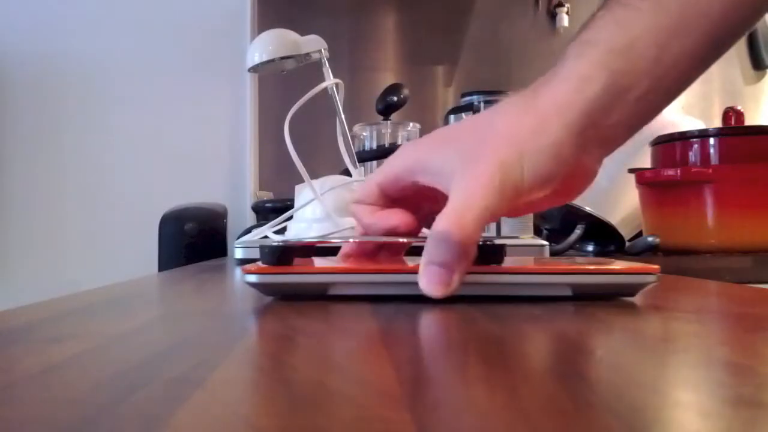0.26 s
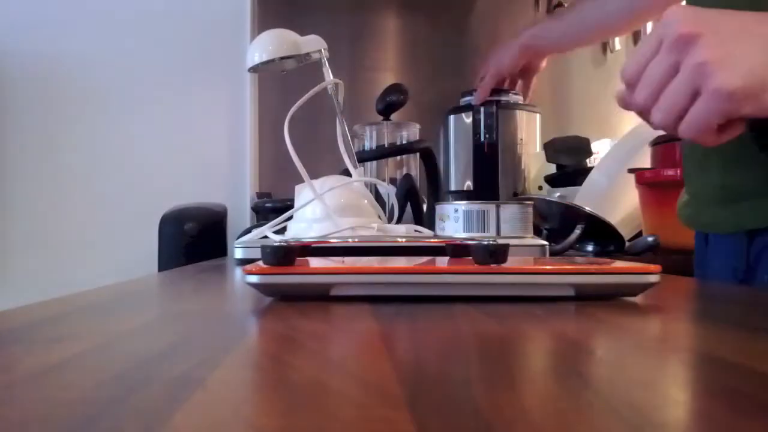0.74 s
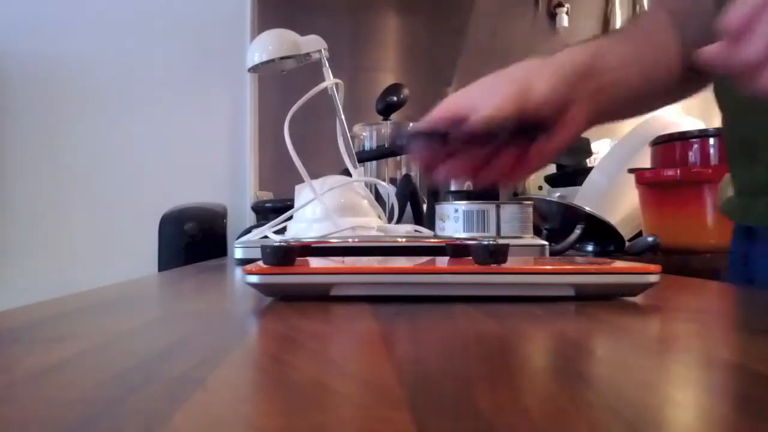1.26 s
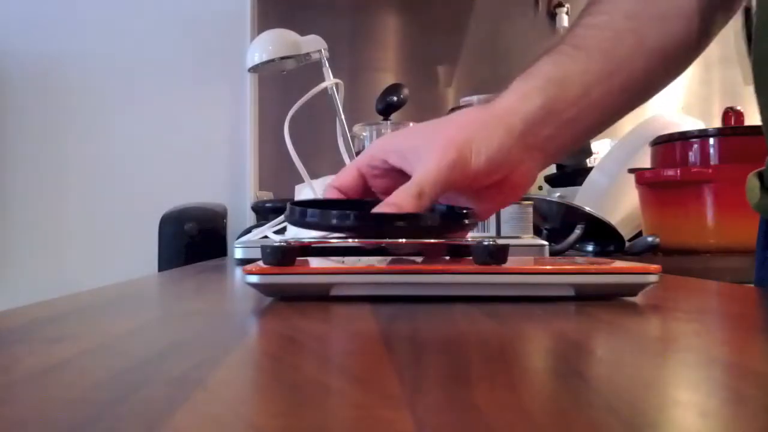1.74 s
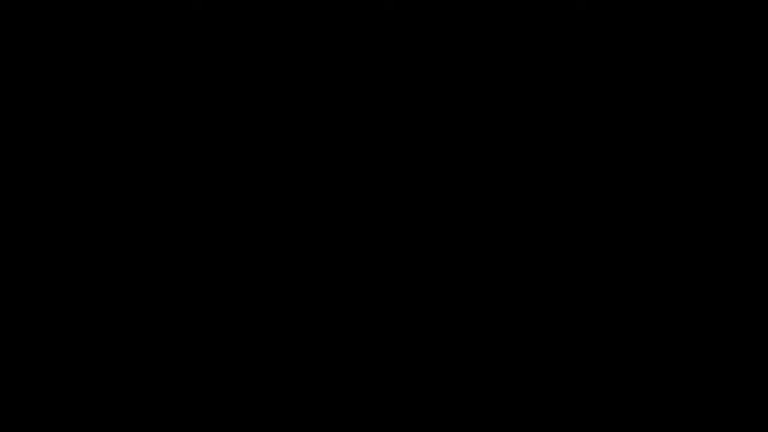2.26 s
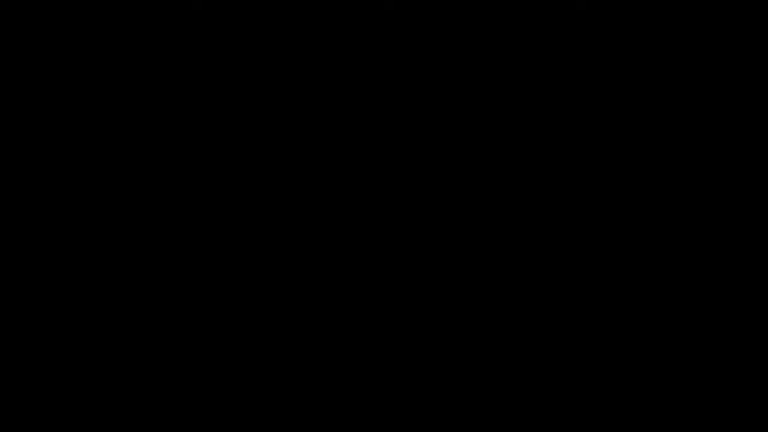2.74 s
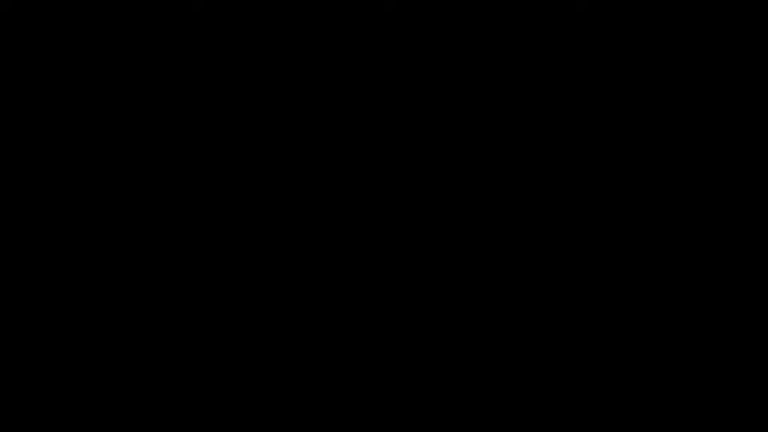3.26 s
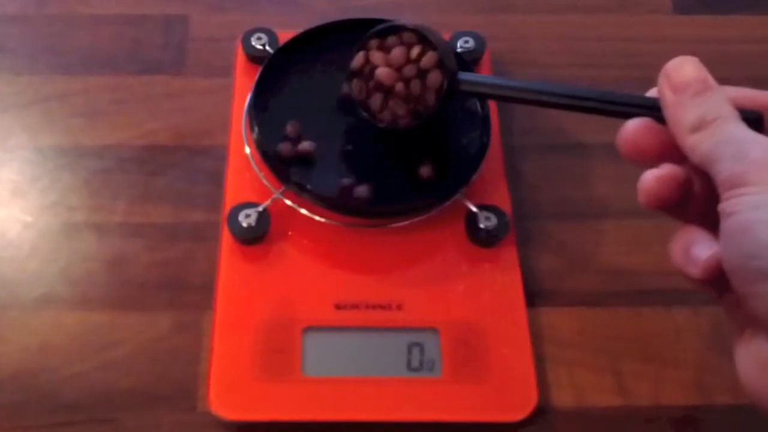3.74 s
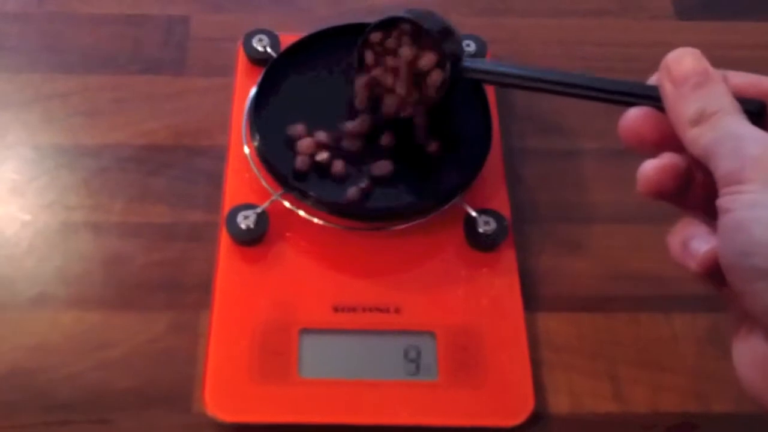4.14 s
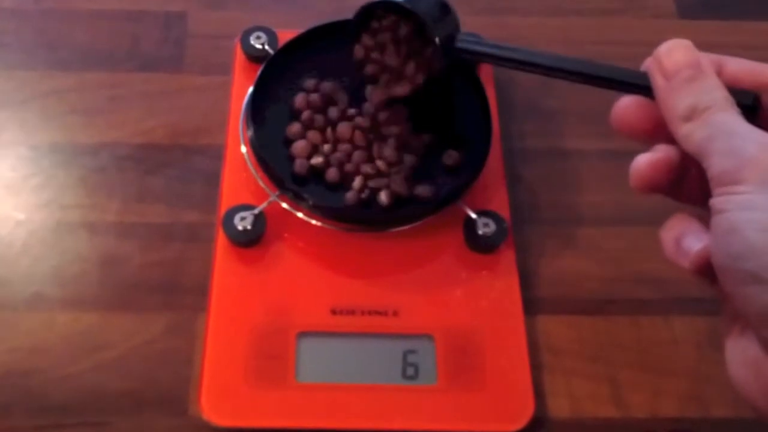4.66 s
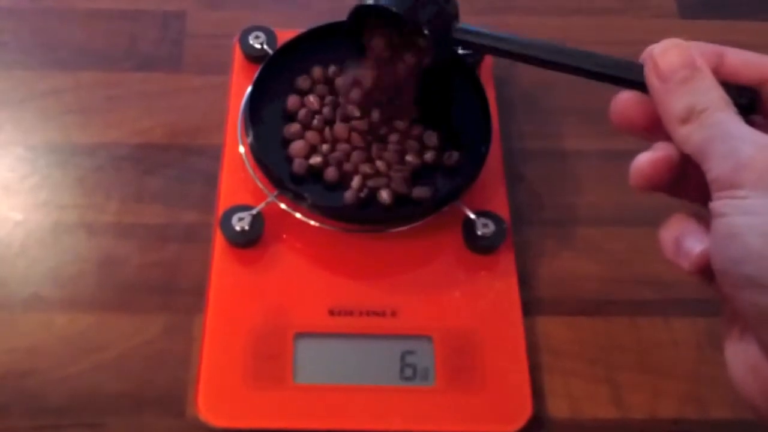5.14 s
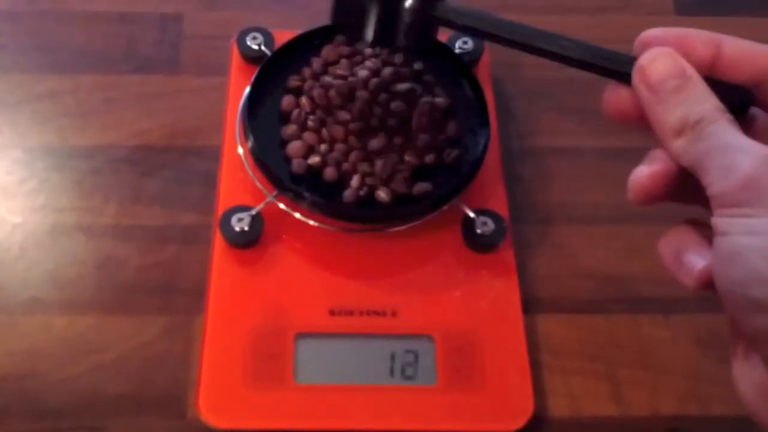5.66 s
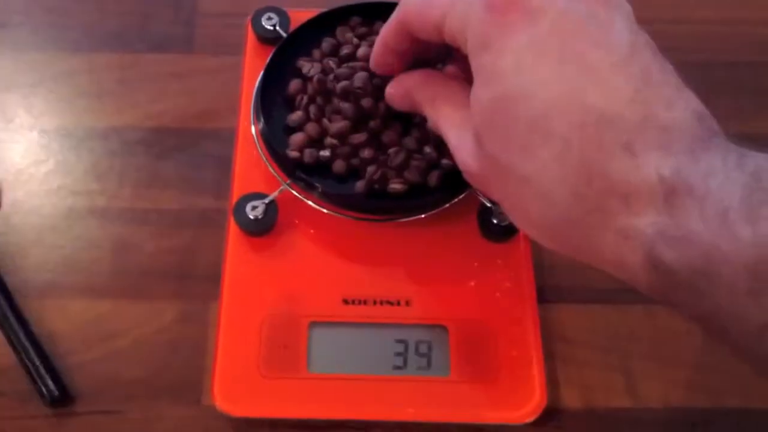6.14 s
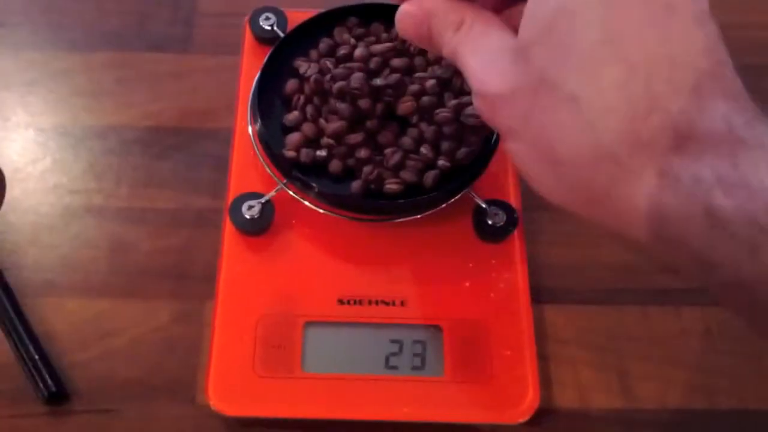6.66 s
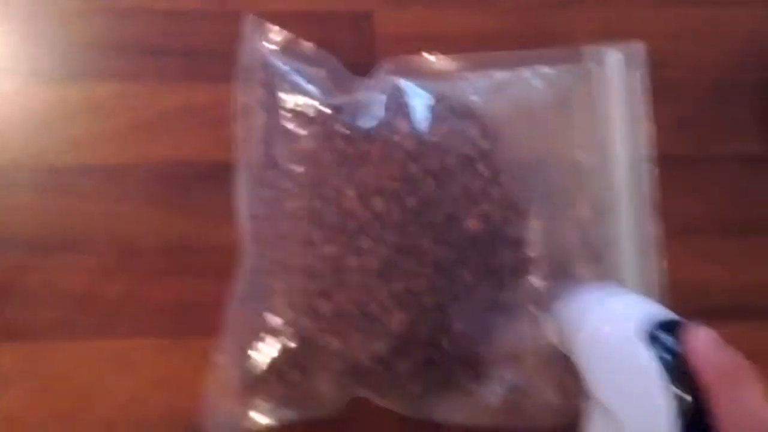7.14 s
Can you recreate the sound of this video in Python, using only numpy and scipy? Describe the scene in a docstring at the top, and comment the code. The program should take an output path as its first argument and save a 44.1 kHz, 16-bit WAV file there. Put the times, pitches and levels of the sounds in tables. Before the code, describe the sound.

In a small echoing kitchen with faint room noise and hum, a scale bumps softly onto the worktop. A grinder's plastic lid squeaks and comes off with a sharp clack, then taps down on the scale. A bag of beans rustles close to the microphone, beans rattle brightly into the lid, and finally a soft rush and a pump click follow.

```python
"""Weighing coffee in a small kitchen, over room noise and a faint hum. First a scale bumps down on the worktop.
A grinder's plastic lid squeaks and clacks as it is pulled off, then taps down on the scale. Next a bag of beans
rustles, with rubbing noise and snapping creases. Beans tip from a scoop into the lid, each ringing its own shell
and the plastic, and a finger nudges them. A soft rush comes in, and a hand pump clicks onto a plastic bag.
Solid things are sums of fading tones, rubbing is shaped crackle, and the kitchen echoes the handling."""
import sys
import numpy as np
from scipy import signal
from scipy.fft import rfft, irfft, next_fast_len
from scipy.io import wavfile
from scipy.ndimage import uniform_filter1d

SR = 44100
rng = np.random.default_rng(int(sys.argv[2]) if len(sys.argv) > 2 else 0)


def store_pcm(level_fs):
    """Save levels as 16-bit WAV."""
    pcm = np.round(np.clip(level_fs, -1, 1) * 32767).astype(np.int16)
    wavfile.write(sys.argv[1], SR, np.atleast_2d(pcm).T)


N = 326340
T = np.arange(N) / SR  # time of every sample, in seconds

# Levels in the tables are starting points: the functions trim and vary them.
# EVENTS
# Moments when the level dips briefly (t/s)
DIPS = [.688, 1.254, 2.169, 3.526, 5.887, 7.046]
# Hands sliding over plastic (t/s, hold/s, level/dB)
SLIDES = [(0, 0.011, -53.5), (.1, 0.44, -68.5), (0.713, 0.18, -53.5), (1.372, 0.11, -54.5),
          (1.69, 0.41, -61), (7.104, 0.033, -54.5), (7.255, .15, -60)]
# Scale, grinder and pump bumping on the worktop, and at 5.5 s the scoop knocking the scale (t/s, level/dB)
BUMPS = [(.003, -43), (0.023, -47), (0.09, -47.5), (0.521, -65), (0.815, -84), (0.875, -49.5), (5.5, -50.5),
         (5.937, -47), (6.099, -61), (7.099, -46), (7.255, -53)]
# Air pushed at the microphone by an arm (t/s, length/s, level/dB)
PUFFS = [(.01, 0.034, -42), (.82, 0.046, -40.5), (1.522, 0.059, -37), (3.26, 0.041, -33)]
# Fingers brushing the lid (t/s, length/s, level/dB)
BRUSHES = [(.81, 0.017, -58.5), (.88, 0.009, -52.5), (1.035, 0.021, -57.5), (1.15, 0.042, -52.5),
           (1.53, 0.055, -50.5), (1.7, 0.015, -53.5), (1.94, 0.011, -61.5)]
# The lid knocking on the grinder and rattling in the hand (t/s, level/dB)
LID_CLACKS = [(1.17, -49), (1.37, -24), (1.383, -34), (1.432, -48), (1.488, -48), (1.583, -50)]
# The lid touching down on the scale (t/s, level/dB)
LID_TAPS = [(1.712, -37.5), (1.734, -38), (1.744, -35.5), (1.76, -40), (1.772, -43), (1.891, -42),
            (1.904, -54), (1.954, -50), (2.059, -51)]
# Pushes of the hand in the bag (t/s, rise/s, hold/s, rubbing level/dB, sharpness/dB)
PUSHES = [(2.181, 0.0069, 0.0028, -42.5, -2), (2.263, 0.0043, 0.021, -34, -2),
          (2.403, .007, .031, -17.5, 8), (2.606, 0.071, 0.03, -16, 4.5), (2.812, 0.12, 0.07, -25, -1),
          (2.986, 0.2, 0.044, -24, 1.5), (3.126, 0.16, 0.055, -23.5, 2.5), (3.237, 0.18, 0.06, -30, 4)]
# Beans that keep shifting between pushes, one row (t/s, length/s, rubbing level/dB, sharpness/dB)
SHIFTING = (2.35, 1.4, -38.5, 4)
# Creases of the bag snapping over (t/s, crack level/dB, wall level/dB)
CREASES = [(2.2558, -30, -31.5), (2.2848, -24.5, -21.5), (2.3513, -24, -32), (2.3605, -25.5, -29.5),
           (2.4933, -32.5, -21), (2.514, -23.5, -17.5), (3.1394, -22, -24), (3.1824, -25, -24),
           (3.257, -31, -23.5), (3.2828, -30, -23.5), (3.3367, -38, -17.5), (3.407, -32, -54),
           (3.4377, -43, -21), (3.444, -27, -31.5), (3.4802, -33.5, -44), (3.4907, -22.5, -43)]
# Single beans, loud and quiet, hitting scoop and lid (t/s, shell click level/dB, plastic ring level/dB)
SINGLE_BEANS = [(3.54, -34, -33.5), (3.552, -28, -43), (3.575, -16.5, -24.5), (3.588, -10.5, -17.5),
                (3.632, -9.5, -19.5), (3.7, -16, -23.5), (3.812, -11, -13.5), (3.874, -12.5, -22),
                (3.919, -8.5, -11.5), (3.971, -14.5, -11), (3.989, -10.5, -14.5), (4.012, -14.5, -13),
                (4.062, -13, -14.5), (4.089, -17, -21), (4.099, -17, -16.5), (4.112, -16, -22),
                (4.156, -7, -17), (4.174, -11.5, -20.5), (4.192, -10, -23), (4.2, -8.5, -18),
                (4.219, -8, -18), (4.241, -4.5, -13.5), (4.28, -14, -26), (4.299, -8.5, -18.5),
                (4.337, -13.5, -16), (4.398, -17, -16.5), (4.405, -14, -26.5), (4.448, -13.5, -27),
                (4.554, -5, -16), (4.594, -11, -19), (4.667, -13.5, -21), (4.7, -17, -19.5),
                (4.798, -22, -24), (4.828, -13, -21), (4.865, -25, -29), (4.885, -20, -21),
                (4.896, -19, -18), (4.964, -18.5, -18), (5.0, -19.5, -17), (5.063, -14.5, -15),
                (5.079, -12.5, -15.5), (5.189, -25, -21.5), (5.426, -16, -30), (5.5, -15, -28),
                (5.564, -25, -33.5), (5.628, -47, -31.5), (5.773, -42.5, -39), (5.954, -29, -28.5),
                (5.962, -36.5, -37), (6.1, -65, -51)]
# Beans sliding off the scoop in surges over a thin trickle; the last row is a finger's nudge
# (t/s, hold/s, shell click level/dB, plastic ring level/dB)
SURGES = [(3.535, 0.21, -38, -35), (3.6, 0.035, -26.5, -28.5), (3.864, 0.91, -45, -37.5),
          (3.977, 0.11, -25.5, -30.5), (4.098, 0.19, -25.5, -24), (4.465, 0.091, -25.5, -24),
          (4.553, 0.043, -19, -21), (4.656, 0.14, -31, -26.5), (4.904, 0.27, -30.5, -30.5),
          (5.075, .44, -29, -25.5), (5.946, 0.004, -50.5, -34.5)]
# Dull thumps of hands leaning on the worktop (t/s, length/s, level/dB)
THUMPS = [(4.91, 0.038, -52.5), (7.147, 0.0065, -44.5)]
# A soft, even rush coming in late (t/s, level/dB)
RUSH = [(5.8, -98), (5.9, -62), (6.55, -60.5), (7.4, -55.5)]
# The pump's nozzle clicking on the bag's valve (t/s, level/dB)
PUMP_CLICKS = [(7.098, -25.5), (7.142, -48), (7.255, -48), (7.369, -52)]

# Tones that an object rings with when struck (f/Hz, time to fade by 60 dB/s, relative level/dB):
# the worktop
WORKTOP = [(155, 0.105, -5), (262, 0.069, -1), (560, 0.07, 3.5), (717, 0.12, 0), (1143, 0.048, 6.5),
           (1640, 0.029, -3), (4200, .02, -31)]
# the grinder, f/Hz, fade/s, level/dB as above
GRINDER = [(718, 0.09, -10), (950, 0.049, -4), (1056, 0.098, 0.5), (1180, 0.19, -9), (1270, 0.058, -8),
           (2110, 0.11, -12), (2350, 0.035, -5), (3740, 0.1, -11), (4409, .09, -13), (5830, 0.059, -6),
           (7450, .09, -14)]
# the plastic lid, f/Hz, fade/s, level/dB as above
LID = [(1330, 0.11, -10), (1700, 0.028, -11.5), (1770, 0.032, -2.5), (1850, 0.007, -6.5),
       (2232, 0.023, -10.5), (2890, 0.0077, -8), (3754, 0.01, -1), (4160, 0.023, -9), (4770, 0.0052, -1.5),
       (5766, 0.009, -0.5), (6400, 0.011, -8.5)]
# the bag's crackling creases, f/Hz, fade/s, level/dB as above
BAG_CRACK = [(2930, 0.0023, -2.5), (4060, 0.0057, 2), (5210, 0.0089, 1), (6270, 0.0039, 1.5),
             (8000, 0.0046, -8.5)]
# the bag's walls, f/Hz, fade/s, level/dB as above
BAG_WALL = [(125, 0.044, -5.5), (316, 0.046, -2.5), (485.5, 0.036, -3), (738, 0.023, 2),
            (1054, 0.044, -5.5), (1440, 0.014, -1)]
# a bean's shell, f/Hz, fade/s, level/dB as above
SHELL = [(7730, 0.0069, -10), (9184, 0.0044, 0.5), (11180, 0.0079, 1.5), (12100, 0.0057, -12.5),
         (12650, 0.0041, 7.5), (13600, 0.0098, -21), (15140, 0.0018, -3)]
# the heap of beans, f/Hz, fade/s, level/dB as above
HEAP = [(2500, 0.0015, -0.35), (3030, 0.0049, -0.9), (4410, 0.0064, 1)]
# the scale, f/Hz, fade/s, level/dB as above
SCALE = [(111, 0.014, -5.5), (237.5, 0.015, -3.5), (400, 0.012, 2.5), (615, 0.01, 2.5), (940, 0.03, 8.5)]
# the pump, f/Hz, fade/s, level/dB as above
PUMP = [(410, 0.016, -16), (916, 0.0026, -24.5), (1480, 0.014, -7), (2680, 0.0047, -2.5),
        (3470, 0.0033, 1.5), (4330, 0.0084, 0.5), (5100, 0.0035, -2), (6920, 0.0024, 1),
        (10150, 0.0015, -4.5), (14500, 0.0055, -6.5)]

# Balance of low and high in each noise (f/Hz, relative level/dB):
# the room noise
AIR_COLOUR = [(15, -32), (25, 8), (102, -4.5), (309, -15), (363, -19.5), (394, -4.5), (463, -24.5),
              (545, -19), (1330, -22.5), (1840, -26), (2410, -36.5), (16000, -24.5)]
# hands sliding, f/Hz, level/dB as above
SLIDE_COLOUR = [(40, -11.5), (150, 8), (650, 5), (1200, -3), (2000, -6.5), (4200, -12), (6500, -16.5),
                (16000, -12)]
# bag walls flapping, f/Hz, level/dB as above
FLAP_COLOUR = [(25, -11.5), (60, -3.5), (130, -2), (250, -3), (550, 2.5), (1150, 0.5), (1800, -3),
               (3000, -10), (8000, -49.5)]
# beans and bag rubbing, f/Hz, level/dB as above
RUB_COLOUR = [(300, -9), (1400, -6.5), (2400, -6), (3500, 2), (5700, 4), (7500, -2), (10000, -15),
              (16000, -29.5)]
# the bag's hiss, f/Hz, level/dB as above
HISS_COLOUR = [(3000, -28), (6500, -2.5), (8500, -1.5), (11500, 2.5), (13500, 2), (16000, -10)]
# beans sliding on each other, f/Hz, level/dB as above
JOSTLE_COLOUR = [(1500, -27.5), (1800, 6), (2050, -3), (3400, -3.5), (3800, 0), (5900, -6.5), (7200, -9),
                 (12600, -7.5), (16000, -21.5)]
# the late rush, f/Hz, level/dB as above
RUSH_COLOUR = [(60, -4), (170, 1), (300, -3.5), (800, -11.5), (1750, -4), (3500, -14), (6000, -25.5),
               (16000, -28)]
# Steady tones of the kitchen hum (f/Hz, level/dB)
HUM = [(100, -68), (398.4, -72)]
# The kitchen's echo in bands (centre f/Hz, time to fade by 60 dB/s, level/dB)
ROOM = [(150, 0.3, -8.5), (1090, 0.97, -9), (1810, 0.32, -6.5), (4000, 0.4, -12.5), (8000, 0.29, -14.5),
        (13000, 0.1, -11)]

AIR_DB = -57  # room noise before its trim
SLIDE_RISE_S, SLIDE_FALL_S = .08, 0.19  # all rises and falls are timed over 20 dB
# The lid squeaks as it slides off, its slip rate rising as it comes free
SQUEAK_S, SQUEAK_HOLD_S, SQUEAK_DB = 0.91, 0.265, -62.5
SLIP_HZ, SLIP_RISE_HZ_PER_S = 542, 74
PUSH_FALL_S = 0.08
FLAP_DB, FLAP_PER_SHARPNESS = 2, -1.085  # a sharp push hisses more and moves the walls less
HISS_POWER = 1.41  # the hiss grows faster than the rubbing as a push speeds up
SURGE_RISE_S, SURGE_FALL_S = 0.031, .08
CONTACT_S, CONTACT_DB = 0.0007, 5  # decay and added level of the crack as a bean touches
HEAP_STARTS_S, HEAP_FILLS_S, HEAP_SHARE = 4.72, 0.92, 0.92  # when, how soon and how fully beans cover the lid
# The scale's level for a full-scale click, and the dB it gains per dB of click
THUD_DB, THUD_SLOPE = -25, 1.92
TOP_HZ = 15900  # upper limit of the finished sound


def undb(db):
    """Turn decibels into a gain."""
    return 10 ** (np.asarray(db) / 20)


def unit(x):
    """Scale a sound to rms 1."""
    return x / np.sqrt(np.mean(x ** 2) + 1e-20)


def swells(rows):
    """Add up bell-shaped rises of gain from (t/s, length/s, level/dB) rows."""
    return sum(undb(db) * np.exp(-((T - s) / length) ** 2 / 2) for s, length, db in rows)


def colour(x, points):
    """Shape a sound's low and high parts by (f/Hz, level/dB) points, then scale to rms 1."""
    hz, db = np.transpose(points)
    size = next_fast_len(len(x))
    f = np.maximum(np.arange(size // 2 + 1) * SR / size, 1)
    gain = undb(np.interp(np.log(f), np.log(hz), db))
    return unit(irfft(rfft(x, size) * gain, size)[:len(x)])


def highpass(x, hz, order):
    """Take away the sound below a frequency."""
    return signal.sosfilt(signal.butter(order, hz, "high", fs=SR, output="sos"), x)


def walk(rate):
    """Drift smoothly at random, about `rate` new aims a second, with a spread near 1."""
    k = max(int(SR / rate), 2)
    steps = np.repeat(rng.standard_normal(N // k + 1), k)
    return unit(uniform_filter1d(steps, k)[:N])


def add(out, s, sound):
    """Mix a sound in at a time."""
    i = int(np.clip(s * SR, 0, N - 1))
    out[i:i + len(sound)] += sound[:N - i]


def blows(times, dbs, modes, detune, scatter_db):
    """Strike an object: its tones ring and fade, and each blow varies their pitches, weights and signs."""
    hz, t60, db = np.transpose(modes)
    t = np.arange(int(t60.max() * SR) + SR // 200) / SR
    fade = np.exp(-np.log(1000) * t / t60[:, None])
    chance = rng.standard_normal((len(times), 3, len(hz)))
    out = np.zeros(N)
    for s, level_db, (pitch, weight, side) in zip(times, dbs, chance):
        tone_hz = hz * (1 + detune * pitch)
        swing = np.sin((2 * np.pi * np.outer(tone_hz, t)).astype(np.float32))
        strength = np.sign(side) * undb(db + scatter_db * weight)
        ring = strength @ (swing * fade)
        first_4_ms = np.std(ring[:SR // 250])  # the blow's level is set here
        add(out, s, ring * undb(level_db) / first_4_ms)
    return out


def crackle(rate, spread_db):
    """Make tiny slips at random moments, most weak and a few strong."""
    size = undb(spread_db * np.minimum(rng.exponential(size=N), 5))
    slips = rng.random(N) < rate / SR
    return unit(slips * size * rng.choice([-1, 1], N))


def movement(s, hold_s, rise_s, fall_s):
    """Gain of one movement: it builds up until s, holds and dies away; rise and fall are timed over 20 dB."""
    away = np.maximum(s - T, 0) / rise_s + np.maximum(T - s - hold_s, 0) / fall_s
    return 10 ** -np.minimum(away, 10)


def together(gains, dbs):
    """Overlapping movements, each at its own level, add in power."""
    return np.sqrt(undb(dbs) ** 2 @ np.square(gains))


def room_noise():
    """The kitchen's quiet background is shaped noise whose level drifts slowly."""
    level = undb(AIR_DB - 3.0 + .5 * walk(2.0))
    return level * colour(rng.standard_normal(N), AIR_COLOUR)


def hum():
    """A faint hum is a few steady tones with slightly wavering levels."""
    return sum(undb(db + 0.64 * walk(3.5)) * np.sqrt(2) * np.sin(2 * np.pi * hz * T) for hz, db in HUM)


def hand_slides():
    """Skin sliding over plastic makes many tiny slips, with an uneven level."""
    moves = [movement(s, hold, SLIDE_RISE_S, SLIDE_FALL_S) for s, hold, _ in SLIDES]
    hands = together(moves, [db for _, _, db in SLIDES])
    return hands * undb(1.6 * walk(60)) * colour(crackle(4000, 3.0), SLIDE_COLOUR)


def worktop_bumps():
    """Things put down make the worktop ring."""
    return blows(*np.transpose(BUMPS), WORKTOP, detune=0.059, scatter_db=0.5)


def air_puffs():
    """An arm pushes air at the microphone, heard as soft swells of very low noise."""
    points = [(10, -11), (26, 2.5), (50, -5.0), (90, -13.5), (1000, -96)]
    return swells(PUFFS) * colour(rng.standard_normal(N), points)


def finger_brushes():
    """Skin brushing on smooth plastic only whispers: fine slips in short swells."""
    points = [(1500, -5.5), (3500, -6.5), (8500, -4.5), (13000, 2.0), (16000, -8.5)]
    return swells(BRUSHES) * colour(crackle(6000, 2.8), points)


def squeak():
    """The sliding lid sticks and slips; the second and third harmonics of its slip rate sing."""
    hz = SLIP_HZ + SLIP_RISE_HZ_PER_S * (T - SQUEAK_S)
    phase = 2 * np.pi * np.cumsum(hz * (1 + .02 * walk(400))) / SR
    pull = movement(SQUEAK_S, SQUEAK_HOLD_S, rise_s=0.088, fall_s=0.072)
    level = undb(SQUEAK_DB + 4.1 * walk(54))
    return pull * level * (np.sin(2 * phase) + np.sin(3 * phase))


def lid_clacks():
    """The lid snaps and rings the grinder, while the plastic chatters in dense, short bursts."""
    s, db = np.transpose(LID_CLACKS)
    burst = sum(undb(d) * (T > t) * np.exp(-np.abs(T - t) / 0.0017) for t, d in zip(s, db))
    points = [(600, -10), (2500, -2.5), (5000, -5), (7500, 1.5), (11000, 3.5), (16000, -3.5)]
    chatter = colour(crackle(14000, 1.6), points)
    ring = blows(s, db, GRINDER, detune=0.013, scatter_db=2.0)
    return undb(-10) * ring + undb(4.5) * burst * chatter


def lid_taps():
    """The empty lid rings higher and longer; the scale's rubber pads take the edge off."""
    empty_lid = np.array(LID) * [1.06, 1.5, 1]
    taps = blows(*np.transpose(LID_TAPS), empty_lid, detune=0.073, scatter_db=0.0)
    taps = highpass(taps, 1800, order=4)
    return undb(3.5) * signal.sosfilt(signal.butter(4, 2200, fs=SR, output="sos"), taps)


def bag_creases():
    """Each crease that snaps over gives a sharp crack and makes the bag's walls ring."""
    s, crack_db, wall_db = np.transpose(CREASES)
    cracks = blows(s, crack_db, BAG_CRACK, detune=0.076, scatter_db=-3.5)
    walls = blows(s, wall_db, BAG_WALL, detune=0.056, scatter_db=6.0)
    return cracks + walls


def bag():
    """With each push dense slips of beans and bag rub and hiss, the walls flap and creases snap over."""
    start, length, shift_db, shift_sharp_db = SHIFTING
    moves = [movement(s, hold, rise, PUSH_FALL_S) for s, rise, hold, _, _ in PUSHES]
    moves.append(movement(start, length, rise_s=0.046, fall_s=0.088))
    rub_db, sharp_db = np.transpose([row[-2:] for row in PUSHES] + [(shift_db, shift_sharp_db)])
    grip_db = 2.05 * walk(160)  # shared by all three noises
    flap_level = together(moves, rub_db + FLAP_DB + FLAP_PER_SHARPNESS * sharp_db) * undb(grip_db)
    flap = flap_level * colour(crackle(2500, 1.04), FLAP_COLOUR)
    rub_level = together(moves, rub_db) * undb(grip_db - 2.0)
    rub = rub_level * colour(crackle(9000, 2.3), RUB_COLOUR)
    hiss_level = together(np.power(moves, HISS_POWER), rub_db + sharp_db)
    hiss_level = hiss_level * undb(grip_db + 2.4 * walk(500) - 5.0)
    hiss = hiss_level * colour(crackle(7000, 3.8), HISS_COLOUR)
    rummaging = (T > DIPS[2]) & (T < DIPS[3])
    return rummaging * (flap + rub + hiss) + bag_creases()


def surging_beans(clicking, ringing):
    """Many more blows come at uneven gaps, with random strengths that follow the surges."""
    count = 700
    end = SURGES[-1][0] + SURGE_FALL_S
    times = DIPS[3] + (end - DIPS[3]) * (np.arange(count) + 2 * rng.random(count)) / count
    size_db = 8.73 * np.clip(rng.standard_normal(count), -2, 1.4)
    shell_db = 20 * np.log10(np.interp(times, T, clicking)) + size_db - 5
    lid_db = 20 * np.log10(np.interp(times, T, ringing)) + .7 * size_db - 6
    return times, shell_db, lid_db


def contacts(times, dbs):
    """Each hard contact gives a very short, toneless crack of fading noise."""
    fade = np.exp(-np.arange(SR // 200) / SR / CONTACT_S)
    out = np.zeros(N)
    for s, level_db, grain in zip(times, dbs, rng.standard_normal((len(times), len(fade)))):
        add(out, s, undb(level_db + CONTACT_DB) * fade * grain)
    return out


def bean_shells(s, shell_db):
    """A bean's small, stiff shell clicks with high, very short tones and a crack."""
    rings = blows(s, shell_db - 1.0, SHELL, detune=.07, scatter_db=2.5)
    return highpass(rings + contacts(s, shell_db), 5300, order=3)


def scoop_and_lid(s, lid_db):
    """Beans ring the scoop, then the lid; as the heap grows, more of each blow goes into other beans."""
    fallen = s > 3.8
    # the scoop is a smaller dish of like plastic, so it rings higher
    small_dish = np.array(LID) * [1.22, 1, 1]
    scoop = blows(s[~fallen], lid_db[~fallen], small_dish, detune=0.055, scatter_db=0.0)
    s, lid_db = s[fallen], lid_db[fallen]
    filled = np.minimum((s - HEAP_STARTS_S) / HEAP_FILLS_S, 1)
    covered = np.clip(HEAP_SHARE * filled, .01, .95)
    lid = blows(s, lid_db + 10 * np.log10(1 - covered), LID, detune=0.023, scatter_db=3.5)
    # a drier, higher knock
    heap = blows(s, lid_db + 10 * np.log10(covered), HEAP, detune=0.084, scatter_db=1.5)
    # so small a dish radiates almost no bass
    return highpass(lid + heap + scoop, 1659, order=12)


def scale_thuds():
    """Single beans carry a low thud of the scale, which grows faster than their click."""
    s, shell_db, _ = np.transpose(SINGLE_BEANS)
    return blows(s, THUD_DB + THUD_SLOPE * shell_db, SCALE, detune=0.25, scatter_db=-1.0)


def beans():
    """Single and surging beans click and ring the plastic, over a fine crunch of beans sliding on each other."""
    at, hold, surge_shell_db, surge_lid_db = np.transpose(SURGES)
    surges = [movement(start, length, SURGE_RISE_S, SURGE_FALL_S) for start, length in zip(at, hold)]
    clicking = together(surges, surge_shell_db)
    ringing = together(surges, surge_lid_db)
    jostle = undb(-5.0) * ringing * colour(crackle(2500, 4.2), JOSTLE_COLOUR)
    single = np.transpose(SINGLE_BEANS)
    s, shell_db, lid_db = np.hstack([single, surging_beans(clicking, ringing)])
    return bean_shells(s, shell_db) + scoop_and_lid(s, lid_db) + jostle + scale_thuds()


def worktop_thumps():
    """Hands leaning on the worktop give short swells of dull, low noise."""
    return swells(THUMPS) * colour(rng.standard_normal(N), [(40, -6.5), (150, -3.0), (1200, -58.0)])


def soft_rush():
    """A soft, even rush is shaped noise that comes in late."""
    s, db = np.transpose(RUSH)
    return undb(np.interp(T, s, db)) * colour(rng.standard_normal(N), RUSH_COLOUR)


def pump_clicks():
    """The pump's stiff plastic rings briefly as its nozzle meets the bag's valve."""
    return blows(*np.transpose(PUMP_CLICKS), PUMP, detune=0.01, scatter_db=-0.5)


def kitchen(x):
    """Tiles and cupboards return a dense echo just over a millisecond late; each band fades at its own pace."""
    t = np.arange(SR // 2) / SR
    hz, t60, db = np.transpose(ROOM)
    f = np.log(np.maximum(np.arange(len(t) // 2 + 1) * SR / len(t), 1))
    noise, echo = rfft(rng.standard_normal(len(t))), 0
    for share, decay, level_db in zip(np.eye(len(hz)), t60, db):
        fade = np.exp(-np.log(1000) * t / decay) * np.clip(t / 0.0012 - 1, 0, 1)
        band = irfft(noise * np.interp(f, np.log(hz), share), len(t))
        echo = echo + undb(level_db) * band * fade / np.linalg.norm(fade)
    return signal.fftconvolve(x, echo)[:N]


def level_dips():
    """Gain that fades nearly to silence before each dip and comes back quickly after it."""
    gain = np.ones(N)
    for s in DIPS:
        fade_out = np.clip((s - .004 - T) / 0.078, 0, 1)
        come_back = np.clip((T - s) / 0.011, 0, 1)
        gain *= np.maximum(fade_out, come_back)
    return gain + undb(-46)


def scene():
    """Mix it all: the bag is closest to the microphone and the handled things furthest, so they echo more."""
    handled = hand_slides() + worktop_bumps() + finger_brushes() + squeak() + lid_clacks()
    handled += lid_taps() + worktop_thumps() + pump_clicks()
    rummaged, poured = bag(), beans()
    echo = kitchen(undb(-0.5) * poured + undb(-7.5) * rummaged + undb(4.0) * handled)
    air = room_noise() + hum() + air_puffs() + soft_rush()
    return ((poured + rummaged + undb(1.0) * handled + echo + air) * level_dips())[None]


def record(dry):
    """Round off the sharpest clicks and cut the sound above TOP_HZ."""
    ceiling = .92
    rounded = ceiling * np.tanh(dry / ceiling)
    return signal.sosfilt(signal.ellip(8, .2, 70, TOP_HZ, fs=SR, output="sos"), rounded)


dry = scene()
out = record(dry)
store_pcm(out)
```